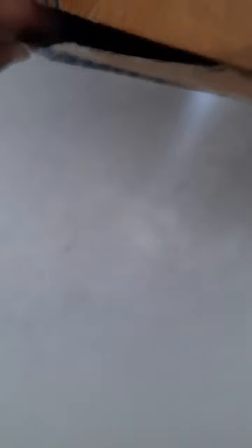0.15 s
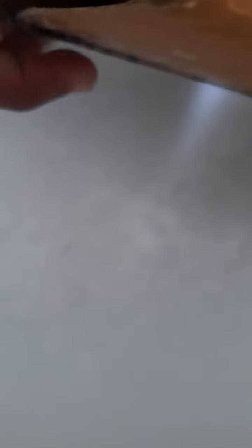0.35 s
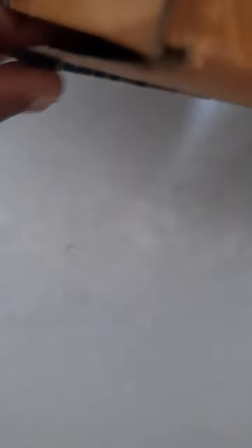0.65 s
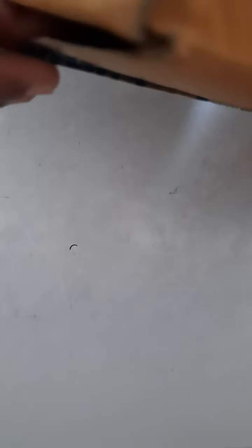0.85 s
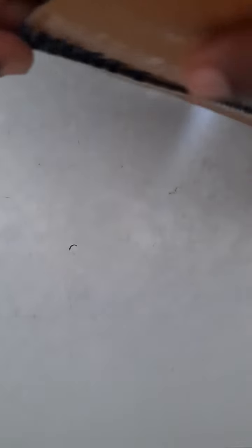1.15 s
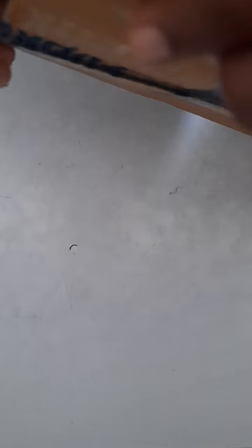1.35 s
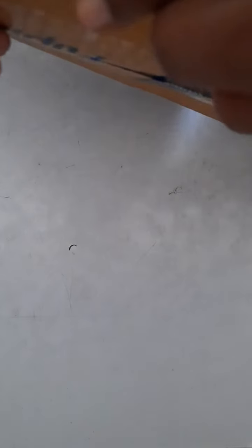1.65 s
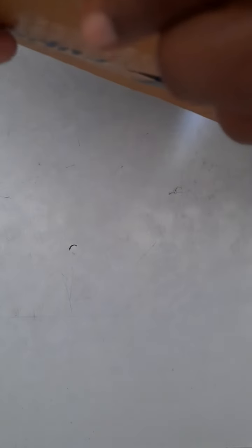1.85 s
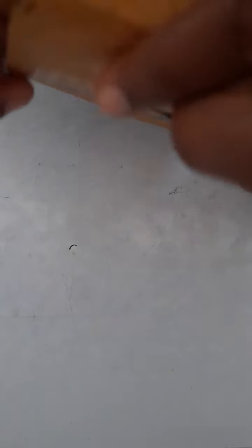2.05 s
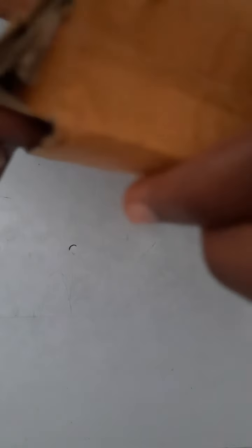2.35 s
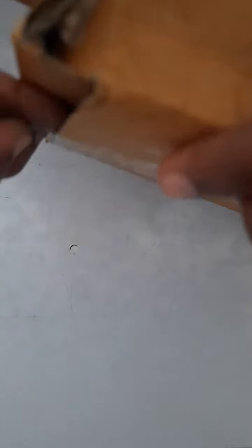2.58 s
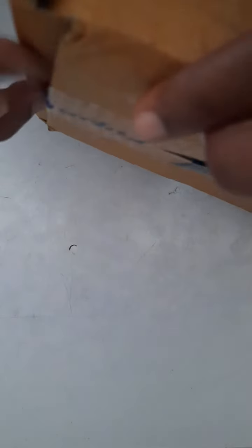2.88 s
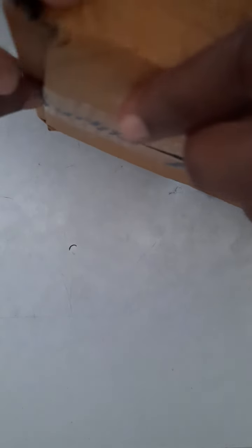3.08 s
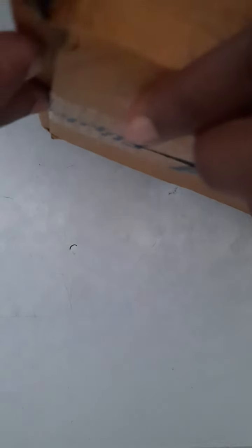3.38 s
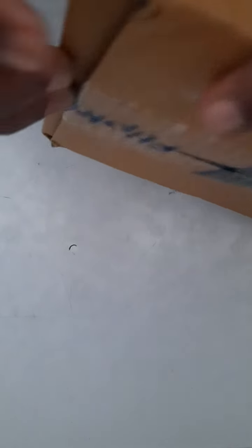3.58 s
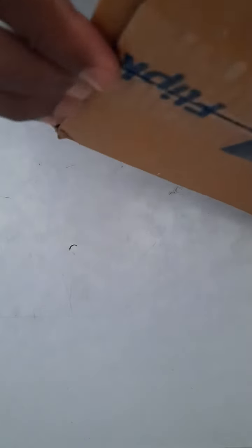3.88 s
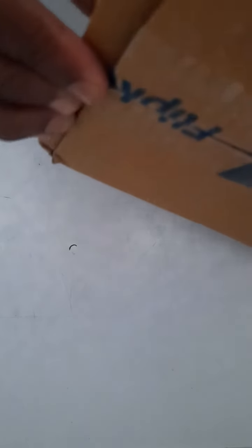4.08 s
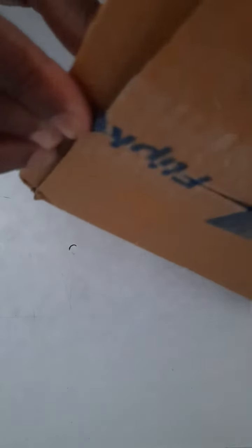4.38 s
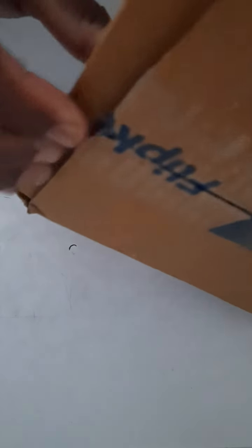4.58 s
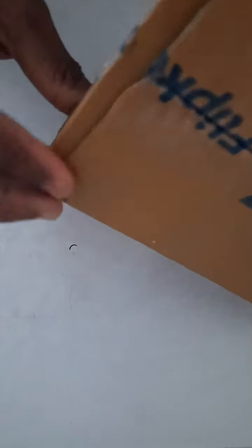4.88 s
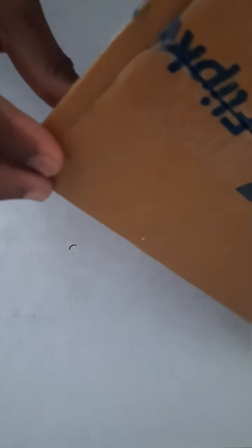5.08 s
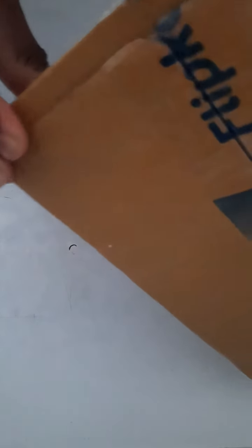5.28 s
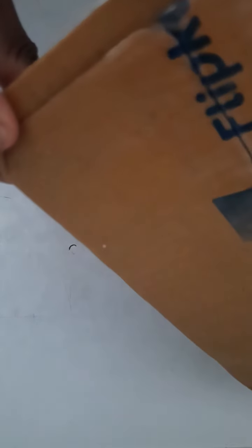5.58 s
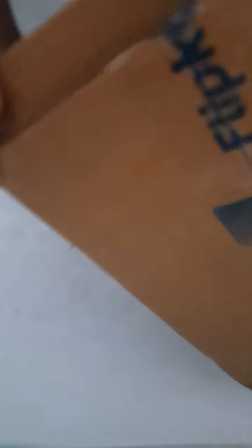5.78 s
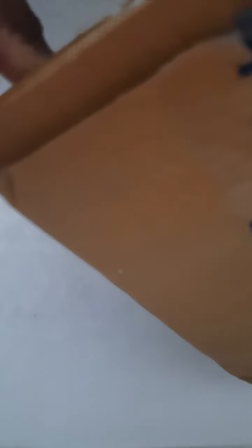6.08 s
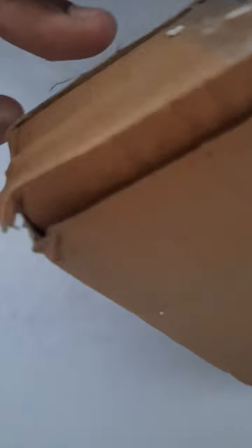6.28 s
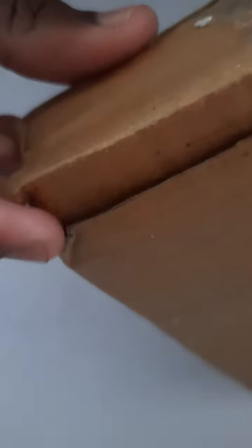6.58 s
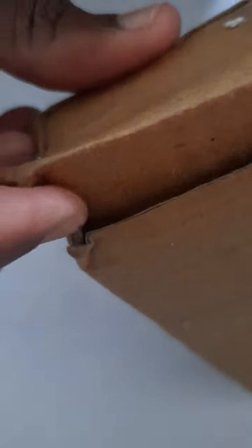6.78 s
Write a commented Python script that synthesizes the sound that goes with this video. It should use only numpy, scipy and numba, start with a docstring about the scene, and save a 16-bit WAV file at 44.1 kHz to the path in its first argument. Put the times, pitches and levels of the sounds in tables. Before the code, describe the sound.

A taped cardboard box is torn open by hand on a hard floor, very close to a phone in a small quiet room. At 0.1 s a crack and dull bump start a scrape; at 0.3 s a stronger juddering drag rings hollow and low, fading by 0.6 s. Soft rubs and small ticks fill the lull, with a moderate rasp at 1.5 s. From 1.97 to 2.5 s sharp, sizzling rips and snaps come fast with peeling ticks, thinning into crinkle. A short crack lands at 2.97 s, bright scrapes at 3.35 s, papery rubbing around 3.7 to 4.2 s, and snaps with peeling ticks at 4.3 to 4.8 s. It quiets to faint rustle until 5.81 s, when the loudest crack bursts out, followed by knocks, scrapes and soft thuds at 6.05 to 6.2 s. Light dull handling and a small tick at 6.48 s end it.

```python
"""Cardboard box torn open

Hands open a taped cardboard box on a hard floor, close to a phone in a small room.
Scrapes swell, hold and fade: random micro-slips drive the rasp, the panel and the box body.
Tape and fibres snap as short noise bursts, peel in runs of ticks and crinkle; freed flaps flutter.
The air in the box rings, soft thuds mark its bumps, and short reflections and a quiet room lie behind."""
import sys
import numpy as np
from scipy import signal
from scipy.fft import rfft, irfft
from scipy.io import wavfile
from scipy.ndimage import uniform_filter1d, map_coordinates
from numba import njit

SR = 44100
rng = np.random.default_rng(int(sys.argv[2]) if len(sys.argv) > 2 else 0)


def waveform_to_disk(signal):
    """Save audio, clipped to [-1, 1], as 16-bit WAV at the path in sys.argv[1]."""
    frames = np.transpose(np.atleast_2d(signal))
    scaled = np.clip(frames, -1, 1) * 32767
    samples = np.round(scaled).astype(np.int16)
    wavfile.write(sys.argv[1], SR, samples)


N = 306054


# Bright edge of breaking fibres; the peak near 8 kHz and the dip above belong to the microphone port
# [f/Hz, relative level/dB]
RASP_SPECTRUM = [(900, -59), (2500, -29.5), (3400, -10.5), (4800, 0.5), (6600, 3), (7300, 9), (7900, 13.5),
                 (8450, 5), (9300, -6), (10800, -8), (12600, 0.5), (16000, -5)]
# Smooth sliding contact, through the same port [f/Hz, relative level/dB]
RUB_SPECTRUM = [(1200, -31.5), (2600, 1), (4000, 3), (6500, 3), (7900, 7.5), (8600, 3), (9400, -10.5),
                (11000, -18.5), (12600, -12.5), (16000, -16.5)]
# Fixed modes of the whole panel [f/Hz, relative level/dB]
PANEL_SPECTRUM = [(300, -25.5), (600, 1), (900, -2.5), (1200, -6), (1480, 3.5), (1680, -4), (1870, 3.5),
                  (2150, -1.5), (2500, -7), (3100, 0), (5000, -22.5)]
# Low resonance of the box body [f/Hz, relative level/dB]
BODY_SPECTRUM = [(40, -23.5), (110, -13.5), (185, -11), (230, -2), (305, 3), (370, 1.5), (470, -3),
                 (700, -15), (1500, -56)]
PANEL_SHARE = .4  # share of the panel's power in its fixed modes, 0-1


def undb(db):
    """Decibels to gain."""
    return 10 ** (np.asarray(db) / 20)


def unit(x):
    """Scale to rms 1."""
    return x / np.sqrt(np.mean(x ** 2) + 1e-18)


def curves(table):
    """Each column of a table, joined by straight lines in time."""
    s, *columns = np.transpose(table)
    return [np.interp(np.arange(N) / SR, s, c) for c in columns]


def response(points, size=2048):
    """Causal impulse response with the given spectrum."""
    hz, db = np.transpose(points)
    f = np.maximum(np.fft.rfftfreq(size, 1 / SR), 1)
    cepstrum = irfft(np.log(undb(np.interp(np.log(f), np.log(hz), db))))
    cepstrum[1:size // 2] *= 2
    cepstrum[size // 2 + 1:] = 0
    return irfft(np.exp(rfft(cepstrum)))[:size // 2]


def through(x, impulse):
    """Pass a sound through an impulse response."""
    return signal.oaconvolve(x, impulse)[:len(x)]


def resonate(x, hz, width_hz):
    """One damped resonance."""
    return signal.lfilter(*signal.iirpeak(hz, hz / width_hz, fs=SR), x)


def add(out, s, sound):
    """Mix a sound in at time s."""
    start = int(s * SR)
    out[start:start + len(sound)] += sound[:N - start]


def walk(rate):
    """Smooth random wander with a spread near 1."""
    k = max(int(SR / rate), 2)
    return unit(uniform_filter1d(np.repeat(rng.standard_normal(N // k + 1), k), k)[:N])


def slips(rate, spread_db):
    """Micro-slips at random moments: many small, a few large."""
    sizes = undb(spread_db * np.minimum(rng.standard_exponential(N), 4))
    return unit((rng.random(N) < rate / SR) * sizes * rng.choice([-1, 1], N))


def scraping(rasp_db=-2.0, rub_db=-1.0, panel_db=0, body_db=-2.0, crackle_db=-8, catch_db=1.73,
             bite_db=-52, bite_range_db=5, bend_width_hz=850, damping=1.0):
    """Light contact rubs smoothly; a hard stroke bites into the fibres and turns bright and grainy."""
    contact, panel, body, pitch_hz = stroking()
    bite = 1 / (1 + np.exp((bite_db - contact) / bite_range_db))
    hard, light = np.sqrt(bite), np.sqrt(1 - bite)
    tearing = slips(rate=3800, spread_db=2.5)
    sliding = slips(rate=11000, spread_db=3.0)
    force = hard * tearing + light * sliding

    # single fibres pop among the dense slips
    fibres = unit(tearing + undb(crackle_db) * slips(rate=49, spread_db=1.0))
    rasp = undb(contact + rasp_db) * hard * unit(through(fibres, response(RASP_SPECTRUM)))
    rub = undb(contact + rub_db) * light * unit(through(sliding, response(RUB_SPECTRUM)))

    # the whole panel has fixed modes; the stretch under the hand rings higher the stiffer it is held
    modes = unit(through(force, response(PANEL_SPECTRUM)))
    # a hard stroke also damps that stretch, which widens its resonance; base width is at half bite
    width_hz = bend_width_hz * (1 + np.clip(damping, 0, 1.8) * (bite - .5))
    grains = slips(rate=3000, spread_db=2.5)
    bend = sweep(sweep(grains, pitch_hz, width_hz), pitch_hz, width_hz)
    bend = unit(bend / np.sqrt(width_hz))
    share = np.clip(PANEL_SHARE, 0, 1)
    panel_mix = np.sqrt(share) * modes + np.sqrt(1 - share) * bend

    out = rasp + rub + undb(panel + panel_db) * panel_mix
    out += undb(body + body_db) * unit(through(force, response(BODY_SPECTRUM)))
    # the edge catches and runs on unevenly, the more so the deeper it bites
    return out * undb(catch_db * hard * walk(rate=130))


# Strokes of blade and fingers; swell and fade are times for 20 dB, levels precede the scrape's trims
# [full strength t/s, swell t/s, hold t/s, fade t/s,
#  rasp level/dB, panel level/dB, body level/dB, pitch of panel under the hand f/Hz]
STROKE_TABLE = [(0.034, .08, 0.058, 0.046, -67, -67, -67, 653),
                (0.098, .008, 0.064, 0.058, -43.5, -45.5, -44, 696),
                (0.326, 0.046, 0.05, 0.057, -35, -40.5, -43.5, 580),
                (0.521, .045, 0.018, .11, -47, -46, -49.5, 900),
                (0.723, 0.027, 0.018, 0.15, -55, -55.5, -54.5, 600),
                (0.919, 0.013, 0.015, 0.1, -56, -59.5, -56.5, 670),
                (0.998, .16, .035, .06, -49, -63, -68, 1400), (1.122, .1, .16, .14, -58.5, -70, -84, 1940),
                (1.285, 0.21, .06, 0.35, -67, -67, -64.5, 876),
                (1.464, .07, 0.016, 0.045, -60, -58.5, -53, 600),
                (1.507, .01, 0.093, 0.058, -45, -49.5, -49.5, 680),
                (1.74, 0.0074, 0.018, 0.28, -67, -65, -57, 550),
                (1.854, 0.08, 0.062, .05, -64, -64.5, -81, 630),
                (1.977, 0.018, 0.039, 0.057, -33, -45.5, -53, 1470),
                (2.049, 0.054, 0.035, 0.27, -47.5, -58, -71, 1440),
                (2.194, .01, .025, 0.054, -48, -73.5, -76, 2280),
                (2.285, .025, 0.077, 0.088, -42, -61, -64, 2110),
                (2.366, 0.037, 0.017, 0.05, -28.5, -50.5, -60.5, 1810),
                (2.456, .08, 0.029, 0.25, -52.5, -59.5, -58.5, 1075),
                (2.596, .15, .15, 0.16, -60.5, -67, -61, 650),
                (2.967, 0.03, 0.012, 0.047, -41.5, -44, -48.5, 1350),
                (3.068, .06, 0.18, 0.12, -65, -70, -76, 1370),
                (3.339, 0.031, 0.077, 0.045, -40, -54.5, -71, 1560),
                (3.389, .02, 0.04, 0.024, -31.5, -48, -67, 1480),
                (3.553, 0.14, 0.02, 0.13, -56, -60.5, -65.5, 1470),
                (3.735, .07, .045, .14, -50, -53, -50.5, 1250),
                (3.832, 0.037, .02, 0.055, -58.5, -61, -58, 850),
                (4.08, .075, .035, .06, -54.5, -57.5, -60, 900),
                (4.16, 0.019, 0.041, 0.11, -48.5, -50, -57, 820),
                (4.329, .09, 0.018, 0.037, -44.5, -57.5, -66, 1740),
                (4.386, .05, 0.014, 0.14, -52, -66.5, -64, 648),
                (4.535, 0.043, 0.045, .05, -59, -65.5, -63, 626),
                (4.665, 0.088, 0.03, 0.082, -49.5, -51.5, -57, 694),
                (4.732, 0.017, 0.009, 0.058, -37.5, -44.5, -52, 1720),
                (4.789, 0.04, .01, .12, -49.5, -47.5, -49.5, 976),
                (4.926, .015, 0.018, 0.11, -66.5, -61, -62.5, 1400),
                (5.107, 0.12, 0.12, 0.18, -56.5, -68, -69, 2205),
                (5.3, 0.15, 0.054, 0.29, -55.5, -62, -66.5, 860),
                (5.557, 0.018, 0.011, 0.15, -57.5, -79.5, -91, 850),
                (5.735, 0.12, 0.065, .05, -60, -63, -64.5, 1200),
                (5.809, 0.014, .018, 0.031, -24.5, -29.5, -40.5, 1400),
                (5.838, .02, 0.023, 0.39, -44.5, -44.5, -47, 800),
                (6.072, .06, .008, 0.016, -37, -37.5, -43.5, 940),
                (6.104, .02, 0.073, 0.081, -50, -47, -47, 708),
                (6.207, 0.035, .015, 0.043, -48, -64, -68.5, 680),
                (6.472, 0.007, 0.012, 0.045, -66.5, -61, -71.5, 2130),
                (6.591, 0.087, .07, .05, -59.5, -68, -82, 710),
                (6.673, 0.025, 0.018, .06, -54, -53.5, -49.5, 560),
                (6.785, .04, .025, 0.046, -56, -57.5, -54.5, 560),
                (6.864, 0.025, .03, 0.087, -60.5, -59, -59, 564)]
# between strokes the fingers keep sliding faintly on the box
IDLE_RASP_DB, IDLE_PANEL_DB, IDLE_BODY_DB, IDLE_HZ = -79, -81, -74, 620
# multipliers on the fade time of panel and body
PANEL_LINGER, BODY_LINGER = 0.96, 1.15


def stroking(size=4096):
    """Strokes add in power: rasp, panel and body levels in dB, and a panel pitch led by the strongest."""
    t = np.linspace(0, N / SR, size)
    idle = undb([IDLE_RASP_DB, IDLE_PANEL_DB, IDLE_BODY_DB]) ** 2
    power = np.outer(idle, np.ones(size))
    weighted_pitch = power[1] * IDLE_HZ
    for s, swell, hold, fade, rasp, panel, body, hz in STROKE_TABLE:
        parts = [(rasp, 1), (panel, PANEL_LINGER), (body, BODY_LINGER)]
        gains = [undb(db) * envelope(t, s, swell, hold, fade * linger) for db, linger in parts]
        stroke = np.array(gains) ** 2
        power = power + stroke
        weighted_pitch = weighted_pitch + hz * stroke[1]
    levels_db = 10 * np.log10(power)
    return curves(np.column_stack([t, *levels_db, weighted_pitch / power[1]]))


# the hand starts and stops cleanly: these powers steepen the flanks away from the middle
SWELL_BEND, FADE_BEND = 1.18, 1.084


def envelope(t, s, swell, hold, fade):
    """Gain that swells to 1 at time s, holds and fades; swell and fade are the times for 20 dB."""
    early, late = np.maximum(s - t, 0) / max(swell, 1e-3), np.maximum(t - s - hold, 0) / max(fade, 1e-3)
    return undb(-20 * np.minimum(early ** SWELL_BEND + late ** FADE_BEND, 10))


@njit
def sweep(x, hz, width_hz):
    """Band-pass whose centre moves."""
    y, band, low = np.empty(len(x)), 0., 0.
    for i in range(len(x)):
        g, k = np.tan(np.pi * hz[i] / SR), width_hz[i] / hz[i]
        v = (band + g * (x[i] - low)) / (1 + g * (g + k))
        band, low, y[i] = 2 * v - band, low + 2 * g * v, k * v
    return y


# Snaps of tape and fibre; levels as rms over 10 ms, before colouring
# [t/s, length t/s, crack level/dB, panel knock level/dB, box body level/dB, knock f/Hz]
SNAP_TABLE = [(0.096, 0.0069, -28, -42, -45.5, 1380), (0.107, 0.0049, -39, -37.5, -44, 970),
              (.273, 0.0026, -74, -52, -48, 710), (.4634, 0.0031, -50, -75, -67, 810),
              (0.591, 0.0029, -55, -53, -73, 626), (.7176, 0.0062, -47, -46.5, -62, 664),
              (.8313, .0012, -51.5, -62, -82, 980), (0.866, .0042, -56, -64, -83, 1320),
              (1.5027, .011, -40.5, -51, -69, 900), (1.634, 0.0014, -65, -58, -64, 1120),
              (1.744, 0.0009, -57, -52, -63, 680), (1.9732, 0.00065, -24.5, -43, -71, 1500),
              (2.0145, 0.0013, -29.5, -36, -67, 1490), (2.101, .0011, -36, -72, -81, 2080),
              (2.128, 0.00044, -39.5, -56, -83, 2290), (2.184, .003, -42, -76, -81, 3020),
              (2.2723, 0.00048, -43, -45.5, -75, 3480), (2.322, 0.0013, -40.5, -76, -71, 2280),
              (2.376, .001, -25.5, -54, -71, 1950), (2.393, 0.008, -37.5, -47, -53, 1440),
              (2.4628, 0.0062, -44.5, -38, -56, 1220), (2.486, 0.00058, -44.5, -65, -78, 870),
              (2.5855, 0.00083, -47.5, -61, -76, 1570), (2.6381, 0.0015, -46, -65, -75, 1680),
              (2.693, 0.0013, -49.5, -73, -79, 1520), (2.7271, 0.0043, -44, -55.5, -76, 1100),
              (2.9773, .0018, -42, -46.5, -70, 1300), (3.061, 0.0077, -53, -55.5, -76, 1460),
              (3.153, 0.01, -54.5, -54.5, -61, 1540), (3.394, 0.0065, -31, -46.5, -82, 2010),
              (3.491, 0.0029, -51.5, -72, -78, 1610), (3.571, 0.0056, -43, -55, -67, 1560),
              (3.7313, 0.0017, -45.5, -45, -45, 1330), (3.7707, 0.0043, -40.5, -51, -70, 1850),
              (4.132, 0.0015, -39.5, -60, -83, 1870), (4.16, .001, -64, -50, -53, 1160),
              (4.326, 0.0051, -37.5, -63, -85, 1950), (4.345, 0.0064, -38.5, -53.5, -54, 2050),
              (4.48, 0.0021, -43.5, -82, -74, 1150), (4.665, 0.0039, -37.5, -44, -70, 1750),
              (4.6744, 0.006, -46, -39, -75, 620), (4.7285, 0.0021, -30, -35, -50, 1700),
              (4.794, 0.0022, -42.5, -40.5, -69, 1640), (4.8349, 0.00061, -35.5, -48, -73, 1940),
              (4.911, 0.0025, -49.5, -51, -56, 1560), (4.937, 0.0014, -72, -55.5, -59, 1130),
              (5.049, 0.0097, -58, -61, -64, 990), (5.3667, 0.00026, -40.5, -61, -78, 1580),
              (5.8144, 0.00075, -24, -30.5, -48, 794), (5.8168, 0.005, -16, -29, -51, 740),
              (5.8191, .0035, -19, -26.5, -54, 1820), (5.968, 0.0029, -41.5, -57, -54, 1000),
              (6.0346, 0.0012, -36, -40.5, -53, 1250), (6.039, 0.0014, -40, -46, -57, 1580),
              (6.0767, 0.0047, -33.5, -22.5, -63, 956), (6.155, 0.0039, -39, -32.5, -36.5, 1100),
              (6.274, 0.00069, -41.5, -61, -70, 818), (6.475, .0011, -34, -52, -76.5, 2170),
              (6.48, 0.00088, -33, -46.5, -82, 2350), (6.485, 0.0026, -39, -49, -85, 2060),
              (6.677, 0.0022, -51, -56, -61, 630), (6.863, 0.0015, -54, -59.5, -83, 680)]


def snapping(crack_db=0, knock_db=0, knock_width=0.81, fade=1.3, spread_db=4, size=2048):
    """Each snap is a short avalanche of fractures: a sharp crack, a damped panel knock, a box thump."""
    out, t = np.zeros(N), np.arange(size) / SR
    rasp, body = response(RASP_SPECTRUM), response(BODY_SPECTRUM)
    for s, length, crack, knock, thump, hz in SNAP_TABLE:
        chance = rng.standard_normal((2, size))
        decay = np.exp(-(t / max(length, 1e-4)) ** fade)
        burst = chance[0] * undb(spread_db * chance[1]) * decay
        burst[0] += 2.5  # the first fibre to break leads
        width_hz = knock_width * hz
        ring = resonate(resonate(burst, hz, width_hz), hz, width_hz)
        parts = [(through(burst, rasp), crack + crack_db),
                 (ring, knock + knock_db),
                 (through(burst, body), thump)]
        add(out, s, sum(unit(part) * undb(db) for part, db in parts))
    # refer the rms of the whole burst to 10 ms
    return out * np.sqrt(.01 * SR / size)


# Colour of what is being cut: tape sizzles, bare cardboard rustles
# [t/s, gain of sizzle above the port dip level/dB, gain of papery rustle level/dB]
MATERIAL_COLOUR = [(.1, -2.5, 3), (.6, 0.5, -5.5), (1.15, 2, 5), (1.55, 0, 5), (1.98, 7, -1.5),
                   (2.4, -4.5, 1), (2.7, -8, 3), (3.4, 4.5, 0), (3.8, -1.5, 4), (4.4, 3, -2.5),
                   (4.75, -4, -1), (5.3, -1, 0.5), (5.85, -2, 5), (6.15, -2.5, 2.5), (6.5, -16.5, -5.5),
                   (6.9, 2, -3)]


def cardboard(sizzle_hz=9400, rustle_low_hz=2400, rustle_high_hz=4700, bounce_hz=1000):
    """Scrapes and snaps as one face of the box radiates them, coloured by what is being cut."""
    scrape = scraping()
    # only short waves leave from the point of contact; long ones come from the whole box
    short_filter = signal.butter(2, bounce_hz, "high", fs=SR, output="sos")
    short = signal.sosfiltfilt(short_filter, scrape)
    sound = scrape - short + floor_bounce(short) + snapping()

    sizzle_db, rustle_db = curves(MATERIAL_COLOUR)
    top_filter = signal.butter(4, sizzle_hz, "high", fs=SR, output="sos")
    top = signal.sosfiltfilt(top_filter, sound)
    paper_filter = signal.butter(2, [rustle_low_hz, rustle_high_hz], "band", fs=SR, output="sos")
    papery = signal.sosfiltfilt(paper_filter, sound)
    return sound + (undb(sizzle_db) - 1) * top + (undb(rustle_db) - 1) * papery


# Delay of the floor's return, shorter when the contact is low [t/s, delay t/ms]
BOUNCE_DELAY = [(0, 0.6), (.55, 0.81), (1, 0.58), (1.12, 0.47), (1.28, 0.31), (1.5, 0.75), (2, 0.65),
                (2.4, 0.57), (2.6, 0.66), (3, 0.61), (3.8, 0.62), (4.3, 0.53), (4.8, 0.56), (5.2, 0.42),
                (5.4, 0.5), (5.85, 0.49), (6.9, 0.85)]


def floor_bounce(x, strength=0.27):
    """Direct and reflected sound make a hollow colour that shifts as the hands move."""
    lag = curves(BOUNCE_DELAY)[0] * SR / 1000  # ms to samples
    reflected = map_coordinates(x, [np.arange(N) - lag], order=3)
    return (x + strength * reflected) / np.sqrt(1 + strength ** 2)


# Freed flaps; level is that at the start of the decay [t/s, level/dB, f/Hz, decay t/s]
FLAP_TABLE = [(.53, -39, 748, 0.03), (.72, -50, 680, 0.034), (2.465, -57, 1090, 0.094),
              (2.975, -49, 500, 0.048), (5.814, -23.5, 614, 0.009), (5.83, -47, 608, 0.089),
              (6.079, -45.5, 665, 0.039)]


def fluttering(width_hz=130):
    """Each freed flap springs in its lowest bending mode, with a rough, quickly dying flutter."""
    out, t = np.zeros(N), np.arange(SR // 2) / SR
    for s, db, hz, decay in FLAP_TABLE:
        noise = rng.standard_normal(len(t))
        ring = resonate(resonate(noise, hz, width_hz), hz, 2 * width_hz)
        add(out, s, undb(db) * unit(ring) * np.exp(-t / decay))
    return out


# Stretches of peeling tape; level is rms over the stretch [start t/s, length t/s, ticks per s, level/dB]
PEEL_TABLE = [(2.057, .29, 120, -54), (2.481, 0.28, 73, -63.5), (3.121, 0.12, 60, -63),
              (4.222, .21, 74, -52), (4.657, 0.12, 94, -53)]


def peeling(spread_db=3, tick_s=0.0017, size=256, count=32):
    """Peeling tape lets go in a loose run of small bright ticks, at most count in each stretch."""
    out, t = np.zeros(N), np.arange(size) / SR
    for s, length, rate, db in PEEL_TABLE:
        run = np.zeros(N)
        for k, chance in enumerate(rng.standard_normal((count, size))):
            # each tick falls at random within its own slot
            late = (k + np.clip(.5 + chance[0] / 3, 0, 1)) / rate
            if late < length:
                add(run, s + late, undb(spread_db * chance[1]) * chance * np.exp(-t / tick_s))
        bright = unit(through(run, response(RASP_SPECTRUM)))
        out += undb(db) * bright * np.sqrt(length * SR / N)
    return out


def crinkling(rate=38, crinkle_db=-61, follow=0.76, reference_db=-50, spread_db=4.0):
    """Loose tape gives tiny bright ticks, louder under a hard stroke by follow dB per dB of contact."""
    contact = stroking()[0]
    ticks = unit(through(slips(rate=rate, spread_db=spread_db), response(RASP_SPECTRUM)))
    return ticks * undb(crinkle_db + follow * (contact - reference_db))


# Drags that ring the air in the box; swell and fade are times for 20 dB
# [full strength t/s, swell t/s, hold t/s, fade t/s, level/dB]
DRAG_TABLE = [(0.15, .05, .008, .06, -41), (0.349, 0.037, 0.046, .068, -35.5)]
AIR_HZ, AIR_WIDTH_HZ = 308.4, 8.6


def hollow():
    """Cardboard juddering over the floor rings the air in the box."""
    judder = slips(rate=1300, spread_db=2)
    ring = resonate(resonate(judder, AIR_HZ, AIR_WIDTH_HZ), AIR_HZ, 44)
    # steady dragging keeps the ring evenly fed; it stops with the drag
    even = ring / np.sqrt(uniform_filter1d(ring ** 2, size=1300) + 1e-18)
    t = np.arange(N) / SR
    return even * sum(undb(db) * envelope(t, s, swell, hold, fade)
                      for s, swell, hold, fade, db in DRAG_TABLE)


# Soft bumps of the box; level is taken before the decay [t/s, level/dB, decay t/s]
BUMP_TABLE = [(0.111, -47.5, 0.036), (.33, -55.5, 0.08), (1.972, -47.5, 0.028), (3.529, -58.5, 0.049),
              (5.815, -68, 0.06), (6.079, -48, 0.05), (6.162, -42, 0.021)]
# Dull low thud [f/Hz, relative level/dB]
THUD_SPECTRUM = [(20, -14), (45, 2), (75, 19), (120, 7.5), (200, -9), (500, -34.5)]


def bumping():
    """Dull thuds of decaying low noise as the box shifts against hands and floor."""
    out, t = np.zeros(N), np.arange(SR // 2) / SR
    thud = response(THUD_SPECTRUM, size=8192)
    for s, db, decay in BUMP_TABLE:
        rumble = unit(through(rng.standard_normal(len(t)), thud))
        add(out, s, undb(db) * rumble * np.exp(-t / decay))
    return out


def reflections(x, t60=0.31, wet_db=-19):
    """Floor and walls return a short, duller tail to each port: decaying noise, from 2 ms on."""
    t = np.arange(SR // 2) / SR
    walls = response([(100, 1), (500, 4.5), (2000, 6.5), (5000, 1), (8000, -6.5), (16000, 5.5)])
    tails = rng.standard_normal((2, len(t))) * np.exp(-np.log(1000) * t / t60) * (t > .002)
    rooms = [through(tail / np.linalg.norm(tail), walls) for tail in tails]
    return undb(wet_db) * np.array([through(x, room) for room in rooms])


# Room rumble and hiss [f/Hz, relative level/dB]
QUIET_SPECTRUM = [(20, -16), (45, -6.5), (66, 6.5), (85, 5), (115, 1), (170, -3), (320, -5.5), (600, -9),
                  (1500, -18), (4000, -23), (7900, -31.5), (9600, -28), (16000, -24)]
QUIET_DB = -71.5  # at the left port


def quiet_room(far_db=-7, shared_db=-3):
    """Faint rumble and hiss, partly shared by the two ports and softer at the right one."""
    quiet = response(QUIET_SPECTRUM, size=8192)
    shared, left, right = (unit(through(rng.standard_normal(N), quiet)) for _ in range(3))
    shared = shared * undb(shared_db)
    return undb(QUIET_DB) * np.array([unit(shared + left), undb(far_db) * unit(shared + right)])


# The far microphone port lies in the shadow of the phone [f/Hz, gain level/dB]
SHADOW_SPECTRUM = [(60, -21.5), (200, -14.5), (400, -21.5), (750, -9), (1300, -12.5), (2400, -16),
                   (4400, -22), (6500, -27.5), (8000, -36.5), (9500, -14.5), (12500, -14.5), (16000, -35)]
PORT_LAG = 21  # samples
FAR_SIDE_SHARE = .45  # share of power from the box's other face at the far port, 0-1


def scene():
    """The box lies by the left port; the right hears it later and shaded, partly from another face."""
    front = cardboard() + fluttering()
    side = cardboard() + fluttering()
    whole = hollow() + bumping() + crinkling() + peeling()
    near = front + whole
    share = np.clip(FAR_SIDE_SHARE, 0, 1)
    far = np.sqrt(1 - share) * front + np.sqrt(share) * side + whole
    far = through(np.pad(far, (PORT_LAG, 0))[:N], response(SHADOW_SPECTRUM))
    return np.array([near, far]) + reflections(near) + quiet_room()


TOP_HZ = 16150


def record(dry):
    """The phone rounds the loudest peaks with a soft ceiling and cuts the top steeply."""
    ceiling = .75
    rounded = ceiling * np.tanh(dry / ceiling)
    top_cut = signal.ellip(10, .2, 75, TOP_HZ, fs=SR, output="sos")
    return signal.sosfilt(top_cut, rounded)


dry = scene()
out = record(dry)
waveform_to_disk(out)
```